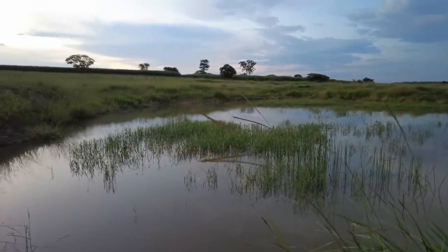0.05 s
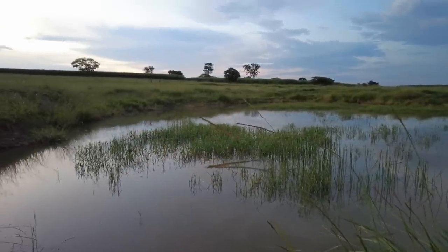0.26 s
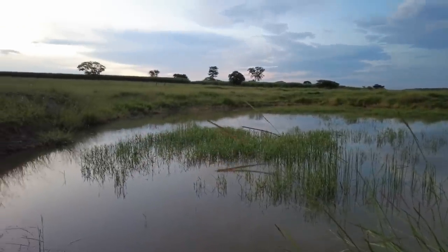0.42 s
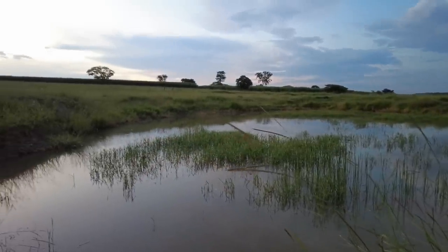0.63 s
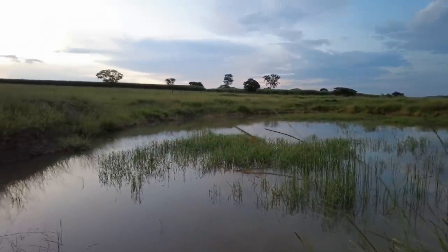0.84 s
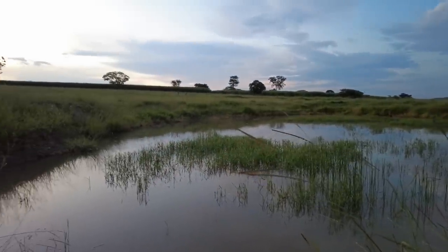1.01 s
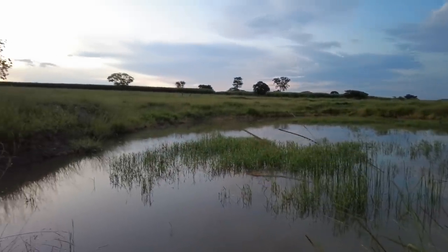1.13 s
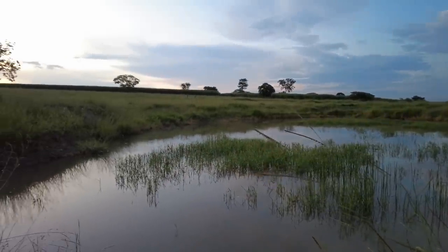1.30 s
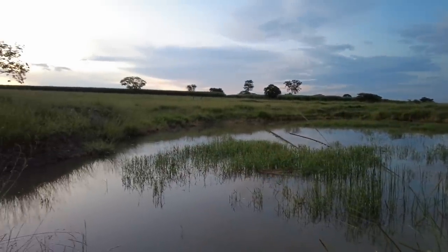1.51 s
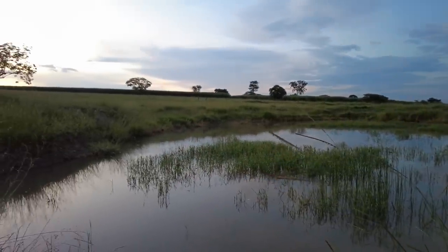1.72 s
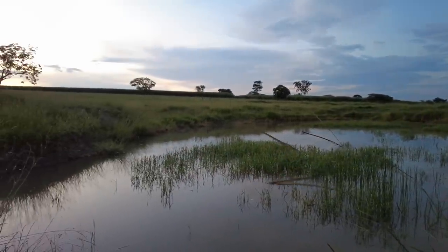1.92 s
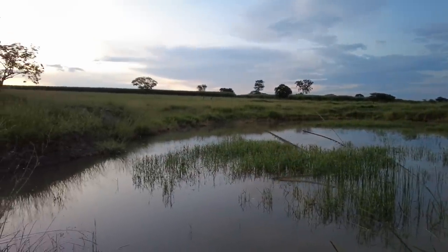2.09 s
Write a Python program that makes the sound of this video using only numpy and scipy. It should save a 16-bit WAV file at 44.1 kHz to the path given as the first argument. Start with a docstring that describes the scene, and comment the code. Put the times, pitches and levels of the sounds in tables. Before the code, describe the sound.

A frog gives two short rasping croaks from pond reeds, with a fainter frog answering between

```python
"""Over a low rumble and faint hiss comes a dry tick, then a frog croaks from the reeds of a pond at dusk.
It croaks twice: trains of sharp pulses that ring its throat and vocal sac, with a breathy buzz around them.
A farther frog answers briefly between the croaks, in quick snaps that ring its own throat.
The reeds scatter each pulse and the far bank sends a late blurred echo, both made from fading noise.
Near the end bubbles plop as short ringing tones, with another tick and a soft rustle of noise."""
import sys
import numpy as np
from scipy import signal
from scipy.fft import rfft, irfft, next_fast_len
from scipy.io import wavfile
from scipy.ndimage import uniform_filter1d

SR = 44100
rng = np.random.default_rng(int(sys.argv[2]) if len(sys.argv) > 2 else 0)


def persist_wave(psi):
    """Save psi, clipped to +-1, as 16-bit WAV."""
    counts = np.round(np.clip(psi, -1, 1) * 32767).astype(np.int16)
    wavfile.write(sys.argv[1], SR, np.atleast_2d(counts).T)


N = 94815


def amp(db):
    """Turn decibels into a plain multiplier."""
    return 10 ** (np.asarray(db) / 20)


def unit(x):
    """Scale a sound to an average (RMS) strength of 1."""
    return x / np.sqrt(np.mean(x ** 2) + 1e-20)


def along(points, hz):
    """Read a table of (frequency, value) points at any frequency, on a log axis."""
    point_hz, value = np.transpose(points)
    return np.interp(np.log(hz + 1), np.log(point_hz + 1), value)


def curve(rows):
    """Draw straight lines through timed rows: one value per sample for each column after the time."""
    times, *columns = np.transpose(rows)
    return [np.interp(np.arange(N) / SR, times, column) for column in columns]


def filtered(x, response):
    """Reshape a sound by multiplying each of its frequencies by response(hz)."""
    size = next_fast_len(N + SR // 2)
    spectrum = rfft(x, size) * response(np.fft.rfftfreq(size, 1 / SR))
    return irfft(spectrum, size)[..., :N]


SNAP_S = .0006  # the snap comes this long after the ringing starts [s]
SHUT_S, SHUT_DB, SHUT_HZ = .0003, -14, 1500  # speed [s] and depth [dB] of shutting, for modes above [Hz]
SCATTER_HZ, SCATTER_DB = .008, 1.2  # chance differences: share of pitch, and level [dB]


def ring_modes(track, s, db, hz, mode_db, t60, rise, hold=.0025):
    """Add modes (ringing tones) that swell, all swing negative together at time s, and die away."""
    start = int((s - SNAP_S) * SR)
    t = np.arange(SR // 8)[:, None] / SR
    pitch_chance, level_chance = rng.standard_normal((2, len(hz)))
    mode_hz = hz * (1 + SCATTER_HZ * pitch_chance)
    swing = -np.cos(2 * np.pi * mode_hz * (t + start / SR - s))
    # after the hold time the upper modes drop, as the folds shut
    shut = SHUT_DB * (hz > SHUT_HZ) * (1 + np.tanh((t - hold) / SHUT_S)) / 2
    fade = amp(mode_db + shut + SCATTER_DB * level_chance - 60 * t / t60)
    swell = (1 - np.exp(-t / rise)) ** 2
    track[start:start + len(t)] += amp(db) * (swing * fade * swell).sum(axis=1)


# Near frog's pulses, some doubled: (time [s], level [dB], sac fullness [0-1], treble [dB])
NEAR_PULSES = [(.091, -43.5, .5, -2), (.1234, -16, 0.05, -5), (.1477, -13, 0.09, -11.5),
               (.1776, -11.5, .1, -7.5), (.2058, -11, 0.5, -5), (.2313, -10.5, 0.3, 1),
               (.2337, -24.5, 1, 6), (.2595, -10, 0.4, -0.5), (.2619, -20.5, 0.4, -12),
               (.2863, -8, 0.83, -2.5), (.3136, -11.5, 0.94, 1), (.3185, -11.5, 0.78, -4.5),
               (.3421, -11, 0.81, -1.5), (.3672, -12, 0.85, -0.5), (.3712, -13, 0.62, -6.5),
               (.396, -15.5, 0.93, -5), (.4217, -21, 0.76, -9.5), (1.6778, -43, 0.9, 4.5),
               (1.7099, -13, 0.79, 0), (1.7329, -11, 0.7, -0.5), (1.759, -10, 0.7, -1),
               (1.7857, -9, 0.7, 0), (1.8137, -12, 0.96, -2), (1.8179, -12.5, 1, -1),
               (1.8419, -9.5, 0.8, -2), (1.8661, -14, 0.93, -3.5), (1.8702, -15, 0.78, -2.5),
               (1.8925, -19, 0.99, -8), (1.9173, -28.5, 0.6, -11)]
# Modes of its throat and sac: (slack pitch [Hz], full pitch [Hz], slack level [dB], full level [dB],
# time to fade by 60 dB [s], rise [s])
NEAR_THROAT = [(770, 725, -24.5, -7.5, 0.022, .0015), (966.4, 650, -10.5, -37, 0.048, 0.00079),
               (1157, 1270, -6.5, -12, 0.013, 0.00034), (1860, 1680, -12.5, -11, 0.027, 0.00042),
               (2070, 2030, -5, -2, 0.041, 0.00047), (1941, 1700, -9, -13, 0.013, 0.00025),
               (2550, 2530, -20, -11.5, 0.035, 0.00043), (2880, 2860, -16, -9.5, .025, 0.00074),
               (3380, 3250, -30.5, -10.5, 0.013, 0.00031), (3900, 3870, -43.5, -15.5, 0.031, 0.00031),
               (4500, 4220, -21, -29.5, .025, .0002), (5584, 5450, -27, -34, 0.015, 0.000067),
               (6300, 6200, -27.5, -33, 0.025, .0002), (7580, 6960, -30, -26.5, 0.0088, .0002),
               (8990, 8900, -46, -40.5, 0.02, .0001), (15000, 17000, -73, -65.5, .015, .0001)]
TREBLE_HZ = 3200  # the treble setting acts above this [Hz]
RASP_DB, RASP_T60 = -40.5, .0067  # noisy edge: level against the pulse [dB], 60 dB fade [s]
# Each pair below is (slack, full)
HOLD_S = (.0044, .0025)  # upper modes ring this long before the folds shut [s]
# weak lead-in just before each pulse: lead, rise [s], level [dB]
LEAD_S, LEAD_RISE_S, LEAD_DB = .0027, .00037, (-30.5, -14)
REBOUND_S, REBOUND_HOLD_S, REBOUND_DB = .0031, .0017, (-22, -7)  # second snap: delay, hold [s], level [dB]


def near_frog():
    """Each pulse rings the throat; a fuller sac shifts the modes and changes their balance."""
    out = np.zeros(N + SR)
    t = np.arange(SR // 20) / SR
    slack_hz, full_hz, slack_db, full_db, t60, rise = np.transpose(NEAR_THROAT)
    for s, db, full, treble_db in NEAR_PULSES:

        def mix(slack, filled):
            """Blend from slack to full by how full the sac is."""
            return slack + full * (filled - slack)

        hz = mix(slack_hz, full_hz)
        mode_db = mix(slack_db, full_db) + treble_db * (full_hz > TREBLE_HZ)
        ring_modes(out, s, db, hz, mode_db, t60, rise, hold=mix(*HOLD_S))
        # the lead-in rings only some middle modes
        lead_in = slice(3, 8)
        lead_in_db = db + mix(*LEAD_DB)
        ring_modes(out, s - LEAD_S, lead_in_db, hz[lead_in], mode_db[lead_in], t60[lead_in], LEAD_RISE_S)
        # the second, shorter snap leaves out the two lowest modes
        rebound_db = db + mix(*REBOUND_DB)
        ring_modes(out, s + REBOUND_S, rebound_db, hz[2:], mode_db[2:], t60[2:], rise[2:],
                   hold=REBOUND_HOLD_S)
        # differences between noise samples give a bright rasp
        rasp = np.diff(rng.standard_normal(len(t) + 1)) * amp(-60 * t / RASP_T60)
        out[int(s * SR):][:len(t)] += amp(db + treble_db + RASP_DB) * rasp
    return out[:N]


# Far frog's pulses: (time [s], level [dB])
FAR_PULSES = [(1.5153, -37), (1.5362, -35), (1.5577, -34), (1.5801, -37)]
# Snaps inside each pulse: (delay [s], level [dB])
SNAPS_IN_PULSE = [(0, 0), (.00155, 0), (.0031, -15)]
# Modes of the far throat: (pitch [Hz], level [dB], time to fade by 60 dB [s], rise [s])
FAR_MODES = [(722, 0, 0.017, 0.0018), (1200, 1, 0.0054, 0.00061), (1500, 2.5, .007, 0.00033),
             (1760, -7, 0.004, 0.0009), (2720, -5.5, 0.0057, 0.00034), (3064, -8.5, 0.0051, 0.0003),
             (3830, -15, 0.0034, 0.00021), (4247, -22.5, 0.014, 0.000099), (5550, -27, .008, 0.00029),
             (6070, -27.5, 0.0072, 0.000089)]


def far_frog():
    """Each pulse is a few quick snaps that ring the far frog's throat."""
    out = np.zeros(N + SR)
    for s, db in FAR_PULSES:
        for late, snap_db in SNAPS_IN_PULSE:
            ring_modes(out, s + late, db + snap_db, *np.transpose(FAR_MODES))
    return out[:N]


# Colour of the buzz: (frequency [Hz], relative level [dB])
BUZZ_COLOUR = [(120, -34), (200, -23), (420, -31), (700, -12), (1400, -5), (2230, -1), (3500, -20),
               (4200, -25.5), (5050, -33.5), (6970, -28.5), (8300, -39.5), (9600, -40.5), (14000, -63.5),
               (15800, -50.5)]
BUZZ_DB, BUZZ_S = -30.5, .0075  # level against each pulse [dB], spread in time [s]


def buzz():
    """Air keeps rasping through the throats around every pulse: noise that swells with each one."""
    now = np.arange(N) / SR
    swell = sum(amp(db) * np.exp(-.5 * ((now - s) / BUZZ_S) ** 2)
                for s, db, *_ in NEAR_PULSES + FAR_PULSES)
    # one noise shared by both ears, plus a separate one for each
    noise = rng.standard_normal(N) + 1.2 * rng.standard_normal((2, N))
    coloured = filtered(noise, lambda hz: amp(along(BUZZ_COLOUR, hz)))
    return amp(BUZZ_DB) * swell * unit(coloured)


# Tone of the scattered sound: (frequency [Hz], relative level [dB])
REED_COLOUR = [(500, 11.5), (1000, -2.5), (2000, -2.5), (4000, 4.5), (8000, -1.5), (15000, 1)]
# How long the scattering lasts: (frequency [Hz], time to fade by 60 dB [s])
REED_FADE = [(700, 0.12), (2000, 0.16), (6000, .05)]


def reeds(x):
    """Stems scatter sound into a short noisy tail, each frequency dying at its own speed."""
    out = np.zeros((2, N + SR))
    step, delay = SR // 10, 90  # in samples: a new tail every tenth of a second, starting 2 ms late
    for at in range(0, N, step):
        hz, t, grains = signal.stft(rng.standard_normal((2, SR // 5)), SR, nperseg=128)
        fade_db = along(REED_COLOUR, hz)[:, None] - 60 * t / along(REED_FADE, hz)[:, None]
        tail = signal.istft(grains * amp(fade_db), SR, nperseg=128)[1]
        wet = signal.fftconvolve(x[None, at:at + step], tail / 20, axes=1)
        out[:, at + delay:at + delay + wet.shape[1]] += wet
    return out[:, :N]


# Tone of the bank and field echo: (frequency [Hz], relative level [dB])
ECHO_COLOUR = [(400, -14.5), (800, -7.5), (1300, -1), (1700, 0), (2000, -2.5), (2400, 1.5), (2900, -2.5),
               (3800, -4.5), (6000, -2.5), (12000, -20)]
BANK_S, BANK_RISE_S, BANK_T60 = .34, .027, 1  # bank echo: delay, rise, 60 dB fade [s]
FIELD_DB, FIELD_T60 = 5.5, .82  # open field: level against the bank echo [dB], 60 dB fade [s]


def bank(x):
    """The open field gives a long thin tail at once; the far bank adds a late, blurred echo."""
    now = np.arange(N) / SR
    t = np.clip(now - BANK_S, 0, None)
    late = (1 - np.exp(-t / BANK_RISE_S)) * amp(-60 * t / BANK_T60)
    field = amp(FIELD_DB - 60 * now / FIELD_T60)
    tail = rng.standard_normal((2, N)) * (late + field) / np.linalg.norm(late)
    echo = signal.fftconvolve(x[None], tail, axes=1)[:, :N]
    return filtered(echo, lambda hz: amp(along(ECHO_COLOUR, hz)))


# Bubble plops: (time [s], level [dB], boost of modes above 500 Hz [dB])
BUBBLE_PLOPS = [(1.939, -60, -5), (2.074, -54.5, 5.5)]
# Modes of a bubble: (pitch [Hz], relative level [dB], time to fade by 60 dB [s])
BUBBLE_MODES = [(234, 3, 0.14), (347, 2.5, 0.071), (724, 9.5, 0.028), (957, -4, 0.036)]
# Dry ticks in the grass: (time [s], level [dB])
GRASS_TICKS = [(0.0625, -60), (2.075, -60)]


def pond():
    """Bubbles ring as a few fading tones; grass ticks are tiny bursts of softened noise."""
    out = np.zeros(N + SR)
    t = np.arange(SR // 50) / SR
    hz, mode_db, t60 = np.transpose(BUBBLE_MODES)
    for s, db, upper_db in BUBBLE_PLOPS:
        ring_modes(out, s, db, hz, mode_db + upper_db * (hz > 500), t60, rise=.002)
    for s, db in GRASS_TICKS:
        soft_noise = uniform_filter1d(rng.standard_normal(len(t)), size=3)
        out[int(s * SR):][:len(t)] += amp(db - 60 * t / .012) * soft_noise
    return out[:N]


# Colour of the rustle: (frequency [Hz], relative level [dB])
RUSTLE_COLOUR = [(2350, -46.5), (4000, -10), (5390, 4), (6230, -6), (8540, 0.5), (10800, -1.5),
                 (15800, -26)]
RUSTLE_S, RUSTLE_LEN_S, RUSTLE_DB = 1.98, .035, -71.5  # middle, spread [s], peak level [dB]


def rustle():
    """A brief airy swish: coloured noise that swells and sinks once."""
    swell = np.exp(-.5 * ((np.arange(N) / SR - RUSTLE_S) / RUSTLE_LEN_S) ** 2)
    swish = filtered(rng.standard_normal((2, N)), lambda hz: amp(along(RUSTLE_COLOUR, hz)))
    return amp(RUSTLE_DB) * swell * unit(swish)


# Colour of the hiss: (frequency [Hz], relative level [dB])
HISS_COLOUR = [(59, -34), (100, -3.5), (205, -14), (249, -17.5), (797, -27.5), (886, -32), (944, -28.5),
               (1410, -28.5), (4930, -26.5), (8550, -34.5), (15800, -40.5)]
# Likeness of the two ears: (frequency [Hz], likeness [1 same, 0 unrelated])
EAR_LIKENESS = [(60, 0.99), (180, 1), (550, 0.21), (1650, 0.93), (4970, 0.03), (15000, -0.03)]
# Hiss over time: (time [s], level between 4000 and 9000 Hz [dB])
HISS_LEVEL = [(0.0, -77.5), (0.17, -81.5), (2.15, -79)]
# Rumble over time: (time [s], deep level [dB], upper level [dB])
RUMBLE_LEVEL = [(0, -60, -69.5), (.22, -58.5, -65), (.5, -50, -65), (.6, -54, -61), (.82, -59.5, -65.5),
                (1.02, -60, -66.5), (1.1, -51, -66.5), (1.27, -59.5, -68.5), (1.5, -55, -67.5),
                (1.63, -59, -71), (1.78, -65.5, -65), (1.92, -60.5, -65.5), (2.04, -58.5, -66),
                (2.15, -52, -66)]
# Colour of both rumbles: (frequency [Hz], relative level [dB])
RUMBLE_COLOUR = [(9.4, -30.5), (16, 0.5), (27, -1), (43, -1), (90, -15), (140, -24), (180, -55),
                 (310, -120)]
DEEP_HZ, SPLIT_HZ = 62, 130  # edges between deep rumble, upper rumble and hiss [Hz]


def air():
    """Filtered noise in three bands: the rumble is alike in both ears, the highest hiss unrelated."""

    def above(hz, edge_hz):
        """Share passed above a soft edge."""
        return hz ** 6 / (hz ** 6 + edge_hz ** 6)

    def middle_and_sides(hz):
        """Split between shared and opposite noise that gives the wanted likeness."""
        turn = np.arccos(np.clip(along(EAR_LIKENESS, hz), -1, 1)) / 2
        return np.array([np.cos(turn), np.sin(turn)])

    def pair(gain):
        """Left and right noise with the given frequency gain."""
        noise = rng.standard_normal((2, N))
        mid, side = filtered(noise, lambda hz: gain(hz) * middle_and_sides(hz))
        return np.array([mid + side, mid - side])

    deep = pair(lambda hz: amp(along(RUMBLE_COLOUR, hz)) * (1 - above(hz, DEEP_HZ)))
    upper = pair(lambda hz: amp(along(RUMBLE_COLOUR, hz)) * above(hz, DEEP_HZ) * (1 - above(hz, SPLIT_HZ)))
    hiss = pair(lambda hz: amp(along(HISS_COLOUR, hz)) * above(hz, SPLIT_HZ))
    hiss_band = filtered(hiss, lambda hz: (hz > 4000) & (hz < 9000))
    deep_db, upper_db = curve(RUMBLE_LEVEL)
    hiss_db = curve(HISS_LEVEL)[0]
    rumble = amp(deep_db) * unit(deep) + amp(upper_db) * unit(upper)
    return rumble + amp(hiss_db) * hiss / np.std(hiss_band)


# Near frog's loudness between the ears: (frequency [Hz], left minus right [dB])
NEAR_SIDE = [(400, .5), (1300, 1), (2400, 2.3), (4400, 1.8), (9000, .5)]
# Near frog's timing between the ears: (frequency [Hz], left leads by [radians])
NEAR_PHASE = [(450, 2), (720, 0.5), (950, 2.5), (1290, 0.14), (3000, 0.67), (4500, 1), (16000, 1.94)]
REEDS_DB, BANK_DB = -15, -39.5  # gains of the scattering and the echo [dB]


def scene():
    """Place both frogs between the ears, then add their reflections and the background."""
    near, far = near_frog(), far_frog()
    ear = np.array([[.5], [-.5]])  # half of each difference goes to each ear
    placed_near = filtered(
        near, lambda hz: amp(along(NEAR_SIDE, hz) * ear) * np.exp(1j * along(NEAR_PHASE, hz) * ear))
    placed_far = far * amp([[1.1], [-1.1]])  # a little to the left
    both = near + far
    reflections = amp(REEDS_DB) * reeds(both) + amp(BANK_DB) * bank(both)
    return placed_near + placed_far + reflections + buzz() + pond() + rustle() + air()


def record(dry):
    """Keep only the frequencies between 15 and 15850 Hz."""
    return filtered(dry, lambda hz: (hz < 15850) & (hz > 15))


dry = scene()
out = record(dry)
persist_wave(out)
```